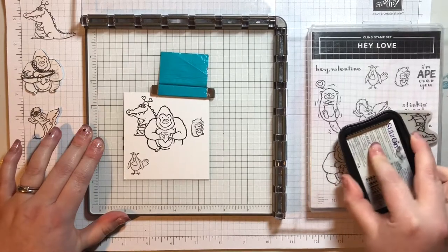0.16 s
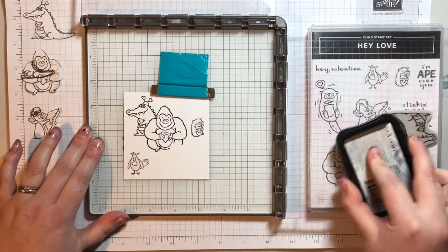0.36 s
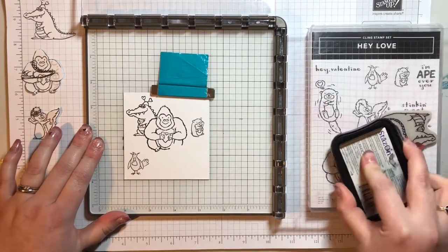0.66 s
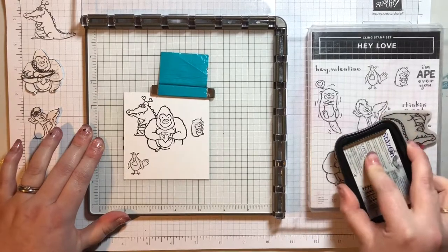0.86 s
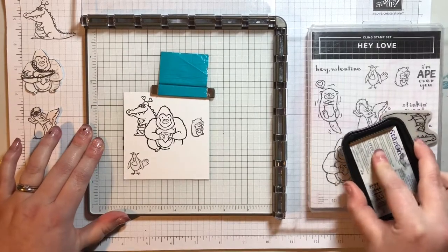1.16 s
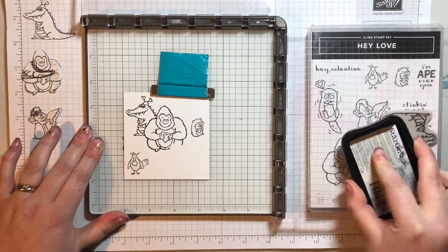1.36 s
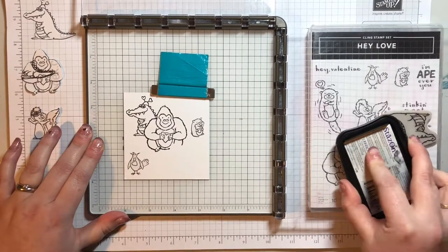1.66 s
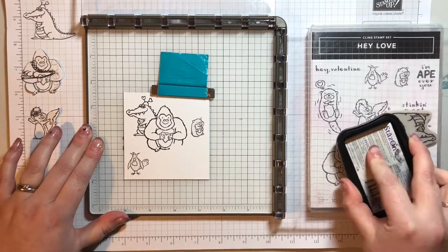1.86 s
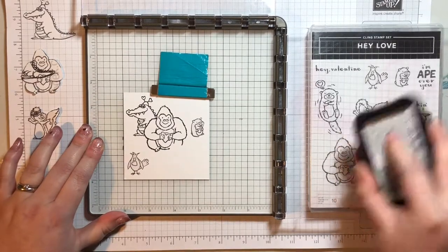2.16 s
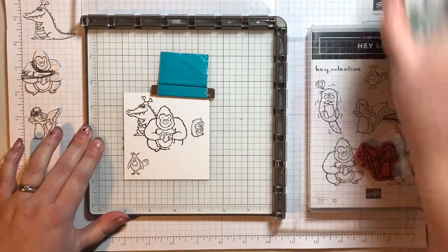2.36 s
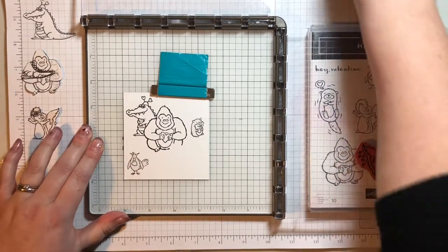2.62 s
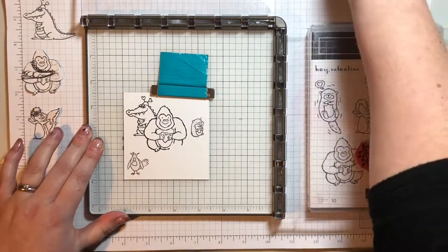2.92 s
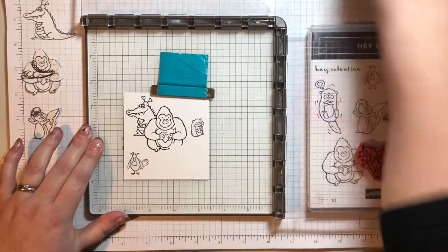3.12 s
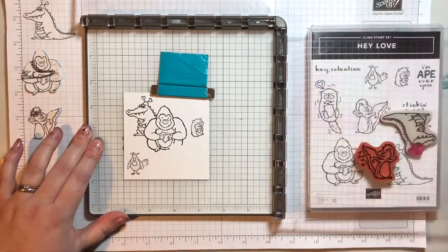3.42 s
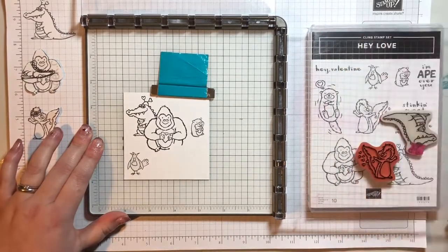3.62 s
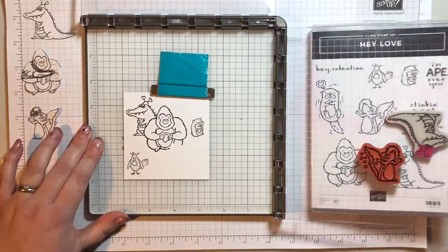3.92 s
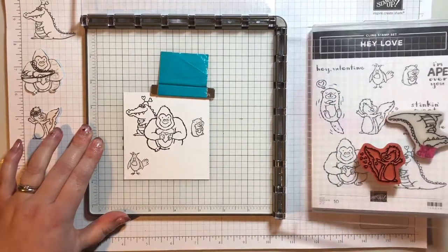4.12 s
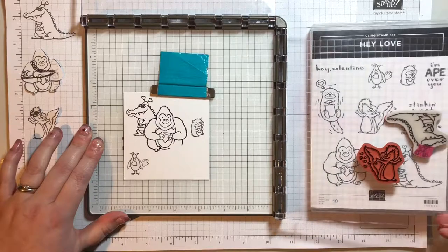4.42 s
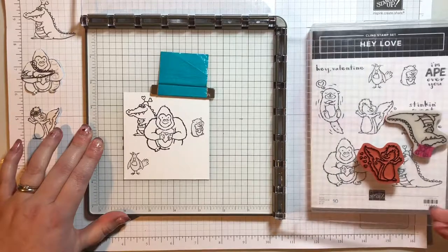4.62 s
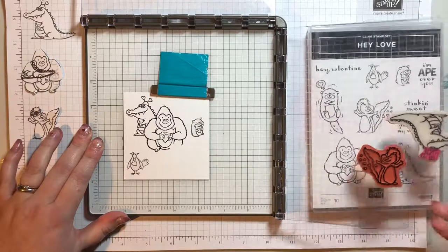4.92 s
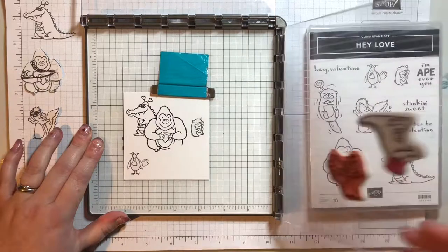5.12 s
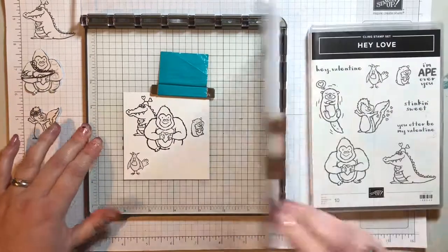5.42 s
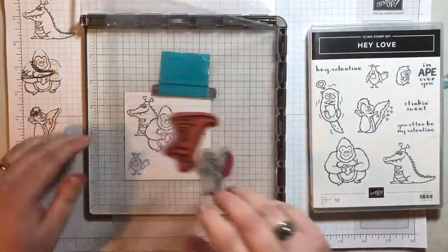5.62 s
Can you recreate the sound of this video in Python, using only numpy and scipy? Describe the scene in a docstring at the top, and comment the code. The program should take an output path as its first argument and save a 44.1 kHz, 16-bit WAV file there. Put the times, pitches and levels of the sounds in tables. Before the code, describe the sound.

An ink pad is dabbed on a rubber stamp in faint, uneven taps that thud softly in the table. Its hard case is set down and rocks with a few quick knocks, and a sleeve brushes past. After some small ticks, a plastic plate creaks loose from its box in a burst of sharp clicks, followed by light bumps. A phone above the table picks it up in a quiet, humming room.

```python
"""A clear plastic plate, stuck to its box, creaks loose in a run of sharp clicks and swings over on its hinge.
Before that, an ink pad is dabbed on a rubber stamp and set down, rocking on its hard case.
Each blow rings the modes of the thing struck and thuds late in the craft table beneath.
A sleeve brushes past, small things tick and the quiet room hums, all heard from a phone above."""
import sys
import numpy as np
from scipy import signal
from scipy.fft import rfft, irfft, next_fast_len
from scipy.io import wavfile
from scipy.ndimage import uniform_filter1d

SR = 44100
rng = np.random.default_rng(int(sys.argv[2]) if len(sys.argv) > 2 else 0)


def store_pcm(level_fs):
    """Save levels as 16-bit WAV."""
    pcm = np.round(np.clip(level_fs, -1, 1) * 32767).astype(np.int16)
    wavfile.write(sys.argv[1], SR, np.atleast_2d(pcm).T)


N = 254748

# pad lands on stamp: t/s, table thud/dB, centre of the table's ring/Hz
PAD_DABS = [(.281, -58, 203), (.417, -43, 135), (.836, -46.5, 136), (1.024, -63, 149), (1.049, -57.5, 135),
            (1.107, -51, 133.3), (1.441, -49.5, 193.4), (1.633, -50.5, 175), (1.826, -41, 215.5),
            (2.010, -48.5, 177.7)]
# pad case hits the table: t/s, peak/dB, centre/Hz, table thud/dB
CASE_KNOCKS = [(2.7198, -22.5, 2230, -43), (2.727, -19, 1960, -41), (2.758, -33.5, 1980, -39),
               (2.7657, -42.5, 1580, -58), (2.7829, -18.5, 1740, -39), (2.9219, -40.5, 1234, -59.5),
               (3.03, -49.5, 1250, -48), (3.045, -43.5, 1200, -49), (3.058, -44.5, 1050, -52)]
# plate slips on the box: t/s, peak/dB, centre/Hz, lid peak/dB
PLATE_SLIPS = [(4.518, -41.5, 6590, -61), (4.55, -54.5, 6200, -76), (4.566, -47, 6400, -61),
               (4.5937, -34, 5900, -43.5), (4.602, -32, 5900, -52.5), (4.617, -32, 5240, -43),
               (4.6323, -22, 5000, -32), (4.641, -27.5, 5500, -44.5), (4.652, -31, 6500, -36),
               (4.668, -20, 6438, -44.5), (4.6768, -26.5, 5185, -54), (4.6785, -9.5, 6510, -20),
               (4.686, -20.5, 6000, -41), (4.691, -14.5, 5500, -19.5), (4.7005, -10.5, 8200, -30.5),
               (4.711, -23.5, 9660, -40.5), (4.741, -38.5, 6000, -41.5)]
# fingers and hinge bump the plate: t/s, peak/dB, centre/Hz, nail tick/dB, table thud/dB
PLATE_BUMPS = [(.639, -50.5, 530, -65.5, -72.5), (4.3, -46.5, 994, -55.5, -57), (4.327, -72, 500, -58, -64),
               (4.73, -36.5, 607.8, -57.5, -35.5), (5.089, -49, 798.6, -62.5, -42.5),
               (5.294, -40.5, 943, -49, -47), (5.407, -65, 503, -69, -49.5),
               (5.486, -59.5, 800, -60, -67.5), (5.674, -56, 840, -56, -59.5)]


def undb(db):
    return 10 ** (np.asarray(db) / 20)


def noise(colour):
    """Noise of rms 1, coloured by (f/Hz, level/dB) points."""
    hz, db = np.transpose(colour)
    size = next_fast_len(N)
    bins_hz = np.arange(1, size // 2 + 2) * SR / size
    gain = undb(np.interp(np.log(bins_hz), np.log(hz), db))
    coloured = irfft(rfft(rng.standard_normal(size)) * gain, size)[:N]
    return coloured / np.sqrt(np.mean(coloured ** 2))


def flicker(depth_db, rate_hz):
    """A wavering gain: random levels, held and smoothed twice."""
    hold = int(SR / rate_hz)
    steps = np.repeat(rng.standard_normal(N // hold + 1), hold)
    drift = uniform_filter1d(uniform_filter1d(steps, hold), hold)[:N]
    return undb(depth_db * drift / drift.std())


def strike(out, s, peak_db, modes, cycles, contact_s, lag_cycles=0., focus_hz=None, octaves=1.):
    """Add a blow at time s: a ragged contact rings modes near focus_hz; they lose 60 dB in `cycles`."""
    hz, db = np.transpose(modes)[:, :, None]
    detune, phase = rng.standard_normal((2, 2, len(modes), 1))
    scatter_db = 2 * rng.standard_normal(hz.shape)
    if focus_hz:
        db = db - 6 * (np.log2(hz / focus_hz) / octaves) ** 2
    rise_s = contact_s + lag_cycles / hz  # bending waves carry the lows slowly, so they build late
    t = np.arange(int((cycles / hz.min() + 8 * rise_s.max()) * SR)) / SR
    # every mode is a close pair, tuned a little differently at each blow
    pair = sum(.5 ** k * np.sin(2 * np.pi * hz * (1 + .04 * detune[k]) * t + 2 * phase[k])
               for k in range(2))
    ring = undb(-60 * t * hz / cycles) * pair
    ragged = 1 + .8 * rng.standard_normal(len(t))
    push = t / rise_s * np.exp(-t / rise_s) * ragged * np.cos(2 * np.pi * hz * t)
    partials = signal.fftconvolve(ring, push, axes=1)[:, :len(t)]
    partials /= np.abs(partials).max(axis=1, keepdims=True)
    start = int(s * SR)
    blow = np.sum(undb(db + scatter_db) * partials, axis=0)[:N - start]
    out[start:start + len(blow)] += blow * undb(peak_db) / np.abs(blow).max()


def room_tone():
    """A soft bed of room air and microphone hiss, with two thin bands whining on top."""
    air_colour = [(20, -21.5), (60, -8.5), (150, -3), (300, -6.5), (500, -10.5), (1000, -16), (2000, -22),
                  (5000, -25.5), (10000, -29), (16500, -30.5)]  # air and hiss spectrum: f/Hz, level/dB
    whine_bands = [(10050, 500, -93), (15050, 300, -101)]  # narrow hiss: f/Hz, half-width/Hz, level/dB
    out = undb(-70) * flicker(depth_db=.5, rate_hz=2.3) * noise(air_colour)
    for hz, width_hz, db in whine_bands:
        out += undb(db) * noise([(hz - width_hz, -40), (hz, 0), (hz + width_hz, -40)])
    return out


def rumble():
    """Two bands of restless low noise swell and sink."""
    rides = [(0, -61.5, -70.5), (.13, -75.5, -79.5), (.5, -75.5, -74), (1.13, -71.5, -72),
             (2.6, -79.5, -74.5), (2.95, -69, -77.5), (3.2, -78, -77), (3.85, -75, -74), (4., -68, -59.5),
             (4.2, -78.5, -74), (4.33, -76, -64.5), (4.57, -74.5, -73.5), (4.79, -80.5, -68),
             (5.1, -64.5, -69), (5.27, -64.5, -69.5), (5.4, -74, -64.5), (5.6, -66, -68.5),
             (5.78, -65.5, -70)]  # level rides: t/s, low band/dB, deep band/dB
    low_colour = [(50, -25.5), (100, 1.5), (170, -5.5), (300, -10.5), (700, -20), (1500, -46)]  # low band spectrum: f/Hz, level/dB
    deep_colour = [(20, -22), (40, -2.5), (65, 1.5), (90, 2), (140, -43.5)]  # deep band spectrum: f/Hz, level/dB
    t = np.arange(N) / SR
    times, low_db, deep_db = np.transpose(rides)
    low = undb(np.interp(t, times, low_db)) * flicker(depth_db=1.8, rate_hz=14) * noise(low_colour)
    deep = undb(np.interp(t, times, deep_db)) * flicker(depth_db=1.5, rate_hz=10) * noise(deep_colour)
    return low + deep


def brushing():
    """Cloth, skin and plastic brush by, each pass a bell-shaped swell of noise."""
    passes = [(2.54, -76, 0.24, 0.088), (3.01, -72, 0.027, 0.055), (3.35, -78, 0.094, 0.25),
              (5.57, -69, 0.184, 0.325)]  # swells: crest t/s, level/dB, rise/s, fall/s
    friction_colour = [(500, -14), (1200, -4), (2500, -3.5), (4600, -1), (7000, -7.5), (10000, -11),
                       (16000, -15)]  # rubbing spectrum: f/Hz, level/dB
    t = np.arange(N) / SR
    swell = sum(undb(db) * np.exp(-((t - s) / np.where(t < s, rise_s, fall_s)) ** 2)
                for s, db, rise_s, fall_s in passes)
    return swell * flicker(depth_db=1.2, rate_hz=40) * noise(friction_colour)


def room_reverb(direct):
    """A small damped room adds a dense tail that loses its treble first."""
    wet_db, t60_s, onset_s, treble_s, dull_hz = -7.5, .1104, .0014, .015, 7000
    t = np.arange(int(.4 * SR)) / SR
    hiss = rng.standard_normal(len(t))
    dull = signal.sosfilt(signal.butter(1, dull_hz, fs=SR, output="sos"), hiss)
    envelope = undb(-60 * t / t60_s) * (1 - np.exp(-(t / onset_s) ** 2))
    tail = (dull + (hiss - dull) * np.exp(-t / treble_s)) * envelope
    tail /= np.sqrt(np.sum(tail ** 2))
    return direct + undb(wet_db) * signal.fftconvolve(direct, tail)[:N]


def small_ticks():
    """Tiny dry contacts of nails, rings and tacky ink, each a spread of very short modes."""
    ticks = [(1.741, -58, 2520, 0.9), (2.111, -60, 2790, 0.94), (2.1385, -49.5, 4470, 1.17),
             (2.2413, -50.5, 2115, 0.26), (2.243, -54.5, 6020, 1.26), (2.265, -62, 2100, 0.17),
             (2.283, -61, 2060, 0.163), (3.070, -50, 5100, 1.6), (3.765, -56, 4000, 1.14),
             (3.828, -54.5, 2800, 2.15), (4.012, -50, 3500, 2.38), (4.393, -60, 7440, 0.61),
             (5.566, -58, 12000, 0.62)]  # light contacts: t/s, peak/dB, centre/Hz, spread/octaves
    out = np.zeros(N)
    modes = [(hz, 0) for hz in np.geomspace(1000, 15000, num=18)]
    nails = [(s - .001, tick_db, 2900, .8) for s, *_, tick_db, _ in PLATE_BUMPS]
    strays = [(.98 * when * N / SR, -66.5 + 4 * size, 4000 * 2 ** (tone - .5), 1.1)
              for when, size, tone in rng.random((8, 3))]
    for s, peak_db, hz, spread in [*ticks, *nails, *strays]:
        strike(out, s, peak_db, modes, cycles=10, contact_s=.000747, focus_hz=hz, octaves=spread)
    return out


def table_thuds():
    """The soft heavy top takes each blow slowly and booms on; where a dab lands picks its ring."""
    top_modes = [(95, -13.5), (135, -4.5), (180, -7.5), (237, -7.5), (305, -2), (400, -4.5)]  # table top resonances: f/Hz, level/dB
    out = np.zeros(N)
    for s, thud_db, hz in PAD_DABS:
        strike(out, s, thud_db, top_modes, cycles=17, contact_s=.00054, lag_cycles=.896,
               focus_hz=hz, octaves=.837)
    slip_thuds = [(s, lid_db - 18) for s, *_, lid_db in PLATE_SLIPS]
    for s, *_, thud_db in [*CASE_KNOCKS, *slip_thuds, *PLATE_BUMPS]:
        strike(out, s, thud_db, top_modes, cycles=17, contact_s=.00066, lag_cycles=.668,
               focus_hz=233, octaves=1.4)
    return out


def ink_dabs():
    """The pad ticks on the rubber, the stamp and box under it knock, the ink rustles as it lets go."""
    face_modes = [(1300, -2.5), (1800, 0), (2200, -4.5), (2800, -12), (3400, -2), (4000, -8), (4800, -7),
                  (5800, -23)]  # pad face resonances: f/Hz, level/dB
    stamp_modes = [(400, -1.5), (500, 3), (680, -10), (950, -10)]  # stamp and box resonances: f/Hz, level/dB
    tack_colour = [(300, 7), (700, 8.5), (1500, -2), (3000, -8), (5000, -13), (9000, -30.5)]  # spectrum of wet ink parting: f/Hz, level/dB
    tack_rise_s = .01906
    t = np.arange(N) / SR
    knocks, tack = np.zeros((2, N))
    for s, thud_db, _ in PAD_DABS:
        strike(knocks, s - .001, thud_db - 9.5, face_modes, cycles=12, contact_s=.00076)
        strike(knocks, s, thud_db - 6, stamp_modes, cycles=11, contact_s=.000267, lag_cycles=.352)
        age = np.maximum(t - s, 0) / tack_rise_s
        tack += undb(thud_db - 25.5) * age * np.exp(1 - age)
    return knocks + tack * flicker(depth_db=2.2, rate_hz=150) * noise(tack_colour)


def pad_case():
    """Hard hollow plastic rocks to rest; soft landings stay dull."""
    shell_modes = [(490, -8), (720, -8.5), (1160, -2.5), (1360, 0), (1880, -10), (2180, -1.5), (2800, -7),
                   (3400, -3.5), (3750, 2.5), (4300, -7.5), (5120, -6.5), (6040, -1), (7000, -7),
                   (8200, -4.5), (9500, -20), (11000, -13), (12800, -18), (15000, -29.5)]  # case resonances: f/Hz, level/dB
    out = np.zeros(N)
    for s, peak_db, hz, _ in CASE_KNOCKS:
        spread = max(4.5 + .133 * peak_db, .95)
        strike(out, s, peak_db, shell_modes, cycles=15, contact_s=.00018, lag_cycles=.234,
               focus_hz=hz, octaves=spread)
    return out


def plate_creak():
    """Each slip cracks in the stiff plate and the thin lid below answers; bumps knock the lid too."""
    plate_modes = [(2400, -14), (2960, -9), (3700, -5), (4410, -1), (5100, -2), (5700, -3), (6400, -3),
                   (7300, -5), (8100, -6), (9000, -3), (10000, -6), (11200, -4), (12300, -8), (13600, -8),
                   (14800, -6), (15800, -4)]  # clear plate resonances: f/Hz, level/dB
    lid_modes = [(520, -6), (705, -2), (950, -3.5), (1150, -3), (1400, -2), (1750, -4), (2200, -9.5)]  # box lid resonances: f/Hz, level/dB
    edge_mode = [(4430, 0)]  # the free edge sings on faintly: f/Hz, level/dB
    out = np.zeros(N)
    for s, peak_db, hz, lid_db in PLATE_SLIPS:
        spread = max(1.5 + .015 * peak_db, .7)  # harder slips wake more of the plate
        strike(out, s, peak_db, plate_modes, cycles=22, contact_s=.00053, focus_hz=hz, octaves=spread)
        strike(out, s, peak_db - 30, edge_mode, cycles=550, contact_s=.0004)
        strike(out, s + .001, lid_db, lid_modes, cycles=11, contact_s=.0002, lag_cycles=.23)
        for delay_s in rng.exponential(.008, size=3):  # smaller cracks trail the slip
            strike(out, s + delay_s, peak_db - 21.5, plate_modes, cycles=22, contact_s=.00022,
                   focus_hz=3940, octaves=1.3)
    for s, peak_db, hz, *_ in PLATE_BUMPS:
        strike(out, s, peak_db, lid_modes, cycles=11, contact_s=.00014, lag_cycles=.32,
               focus_hz=hz, octaves=.37)
    return out


def scene():
    """Mono mix: the handling with room reverb, the thuds dry, over a low-passed bed of noise."""
    handling = room_reverb(ink_dabs() + pad_case() + plate_creak() + small_ticks())
    thuds = table_thuds()
    bed_lowpass = signal.ellip(8, .2, 60, 15750, fs=SR, output="sos")
    bed = signal.sosfilt(bed_lowpass, room_tone() + rumble() + brushing())
    return (handling + thuds + bed)[None]


def record(dry):
    """The phone cuts the top steeply."""
    return signal.sosfilt(signal.ellip(10, .2, 80, 16800, fs=SR, output="sos"), dry)


dry = scene()
out = record(dry)
store_pcm(out)
```